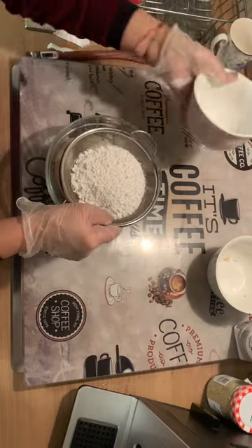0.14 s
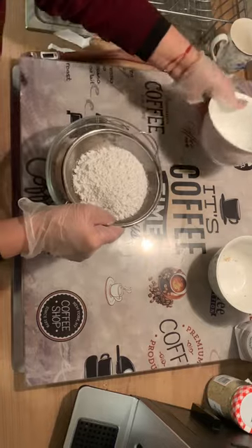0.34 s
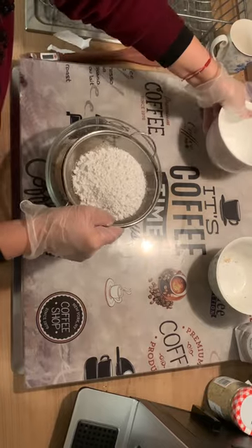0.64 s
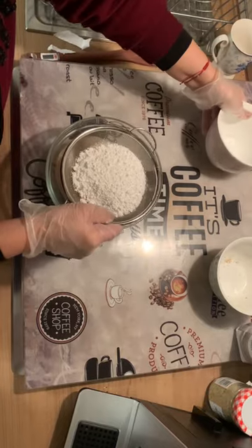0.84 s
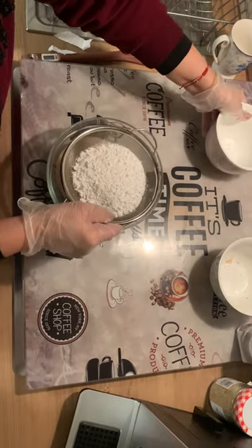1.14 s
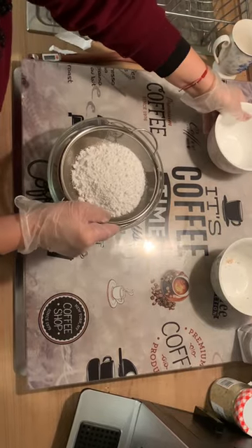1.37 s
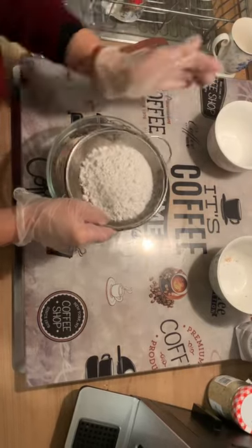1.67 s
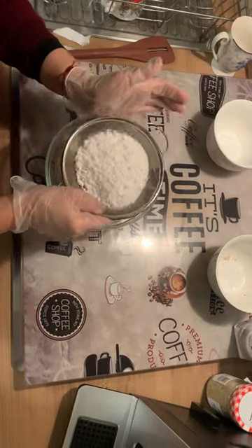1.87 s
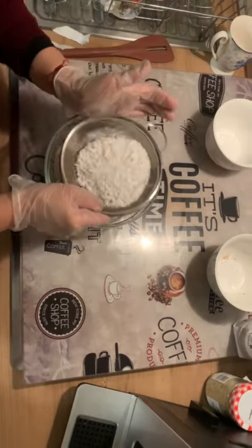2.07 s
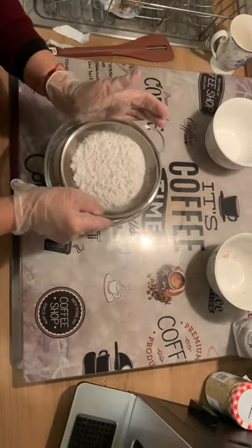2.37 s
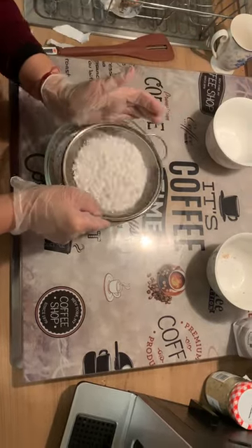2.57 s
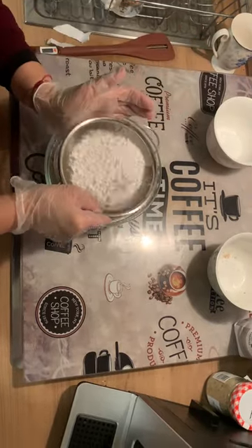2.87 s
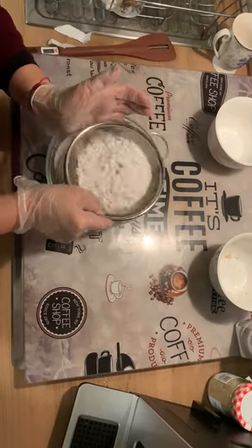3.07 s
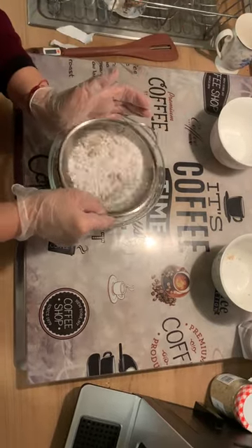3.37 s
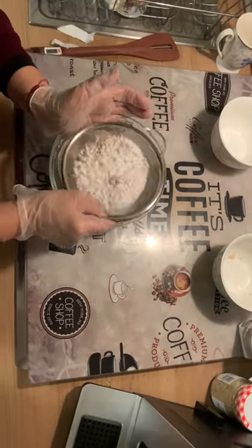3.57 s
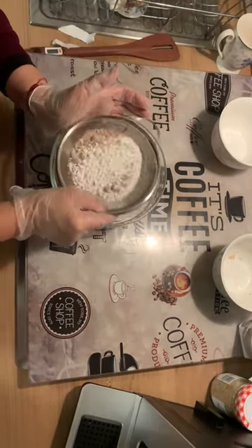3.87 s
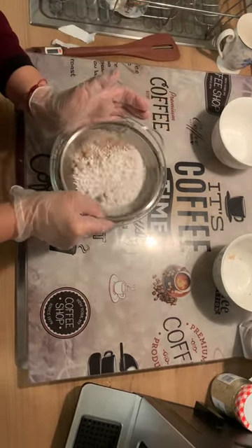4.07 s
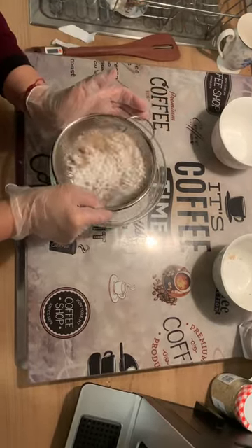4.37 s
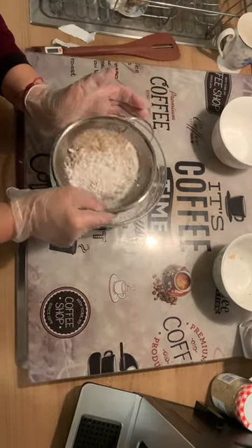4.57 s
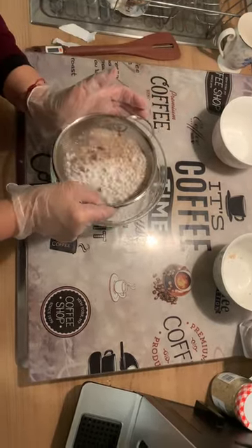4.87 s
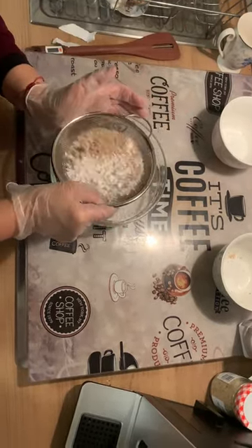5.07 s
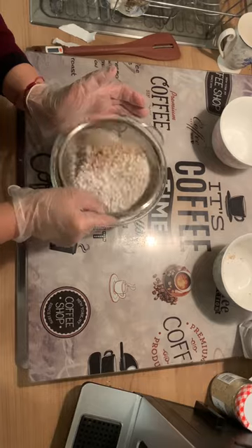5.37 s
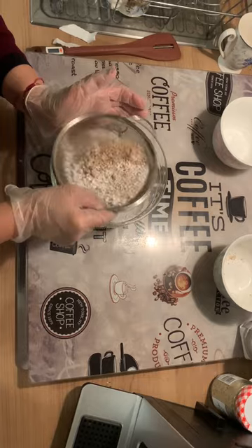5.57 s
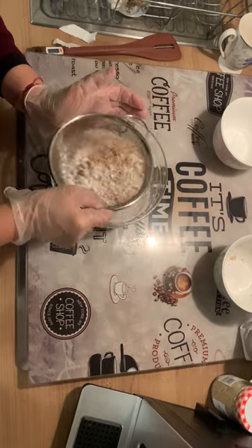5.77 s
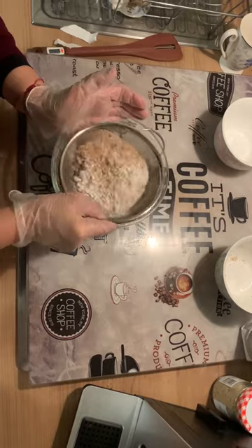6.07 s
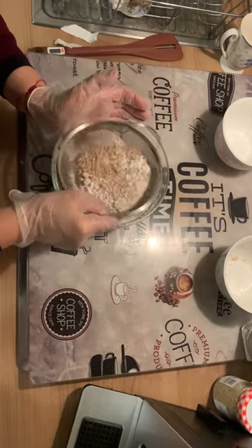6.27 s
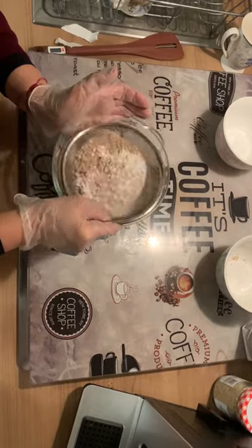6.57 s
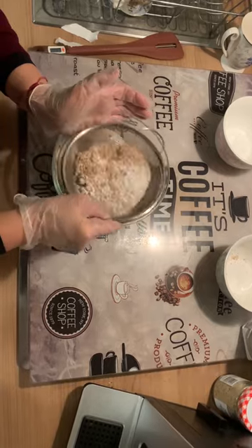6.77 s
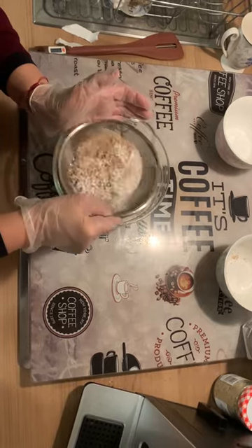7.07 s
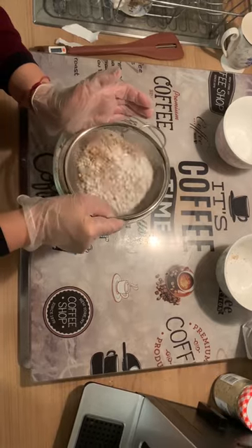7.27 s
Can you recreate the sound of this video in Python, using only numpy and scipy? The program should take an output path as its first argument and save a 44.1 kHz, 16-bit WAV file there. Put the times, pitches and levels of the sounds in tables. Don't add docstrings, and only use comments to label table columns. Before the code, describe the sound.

Close up in a small kitchen, the last sugar rustles softly out of a bowl. The bowl is put down on a board with two loud, clattering knocks and a low counter thud. After a brief glove swish, a fine sieve is tapped on a palm nearly six times a second, each stroke a crisp grainy hiss, growing stronger to the end. A fridge hums faintly.

```python
import sys
import numpy as np
from scipy import signal
from scipy.fft import rfft, irfft, next_fast_len
from scipy.io import wavfile
from scipy.ndimage import uniform_filter1d

SR = 44100
rng = np.random.default_rng(int(sys.argv[2]) if len(sys.argv) > 2 else 0)


def invert_db(level):
    return 10 ** (np.asarray(level, dtype=float) / 20)


def store_pcm(level_fs):
    pcm = np.round(np.clip(level_fs, -1, 1) * 32767).astype(np.int16)
    wavfile.write(sys.argv[1], SR, np.atleast_2d(pcm).T)


N = 328104


def rms_one(x):
    return x / np.sqrt(np.mean(x ** 2) + 1e-20)


def at_hz(points, hz):
    points = np.array(points)
    return np.interp(np.log(hz + 1), np.log(points[:, 0]), points[:, 1])


def colour(x, spectrum):
    size = next_fast_len(N)
    gain = invert_db(at_hz(spectrum, np.fft.rfftfreq(size, 1 / SR)))
    return rms_one(irfft(rfft(x, size) * gain, size)[..., :N])


def bandpass(x, low_hz, high_hz):
    return signal.sosfilt(signal.butter(2, [low_hz, high_hz], "band", fs=SR, output="sos"), x)


def wander(size):
    return rms_one(uniform_filter1d(uniform_filter1d(rng.standard_normal(N), size), size))


def add(track, start_s, shape):
    at = round(start_s * SR)
    track[..., at:at + shape.shape[-1]] += shape[..., :N - at]


def ring(clicks, hz, t60_s):
    r = invert_db(-60 / (t60_s * SR))
    w = 2 * np.pi * min(hz, 0.45 * SR) / SR
    return signal.lfilter([0, np.sin(w)], [1, -2 * r * np.cos(w), r * r], clicks + 1e-18)


# frequency in Hz, level in dB per Hz.
HUM_SPECTRUM = [(15, -30), (31, -23), (37, -5.5), (44, 0), (68, -21.5), (88, -4), (100, 3), (112, -5.5),
                (135, -18.5), (200, -27), (300, -30.5), (450, -40.5), (900, -88.5)]
# frequency in Hz, level in dB per Hz.
HISS_SPECTRUM = [(200, 8), (500, 4), (1000, -0.5), (2500, -0.5), (5000, -2.5), (9000, -4), (12000, -2.5),
                 (14000, -5.5), (16000, -14.5)]


def hum_and_hiss():
    hum = invert_db(-52.5) * colour(rng.standard_normal((2, N)), HUM_SPECTRUM)
    hiss = invert_db(-67) * colour(rng.standard_normal((2, N)), HISS_SPECTRUM)
    return hum + hiss


# frequency in Hz, level in dB per Hz.
GRAIN_SPECTRUM = [(250, -18.5), (650, -8.5), (1000, -7), (1300, -9), (2000, -5.5), (3500, -1.5), (5200, 6),
                  (6500, 7.5), (7600, 3.5), (9200, 0.5), (10500, -5), (12000, -0.5), (14000, -19.5),
                  (16000, -18.5)]


def grain_noise(per_s, spread_db, clump_db, patchy_db):
    struck = rng.random((2, N)) < per_s / SR
    strength = invert_db(spread_db * np.minimum(rng.exponential(1, (2, N)), 4))
    ticks = struck * strength * rng.standard_normal((2, N))
    ticks = colour(ticks, GRAIN_SPECTRUM) * invert_db(clump_db * wander(size=90))
    edges_hz = [200, 1000, 1700, 2700, 3700, 5000, 6300, 7800, 9500, 12000, 17000]
    return [bandpass(ticks, low, high) * invert_db(patchy_db * wander(size=700))
            for low, high in zip(edges_hz, edges_hz[1:])]


# loudest moment in seconds, level in dB, rise in seconds, fall in seconds, dull part in dB.
SWISHES = [
    (0.01, -55, 0.039, 0.045, -10),
    (0.1, -66.5, 0.076, 0.079, -2.5),
    (0.23, -54, 0.048, 0.047, -13),
    (0.375, -55, 0.013, 0.019, -4),
    (1.41, -59, 0.022, 0.043, -15),
    (1.47, -59, 0.021, 0.039, 2.5),
    (1.584, -63, .03, 0.057, -6.5),
]


def loose_sugar(bands):
    bright = rms_one(sum(bands[5:])) * invert_db(5)
    dull = rms_one(sum(bands[1:3])) * invert_db(3) + rms_one(bands[3]) * invert_db(8.5) + rms_one(bands[4]) * invert_db(2)
    now, out = np.arange(N) / SR, np.zeros((2, N))
    for s, db, rise_s, fall_s, dull_db in SWISHES:
        swell = invert_db(db) * np.exp(-np.abs(now - s) / np.where(now < s, rise_s, fall_s))
        out += swell * (bright + invert_db(dull_db) * dull)
    return out


# start in seconds,
# peak in dB, frequency in Hz, swell in seconds.
THUMPS = [(0.298, -35.5, 75, 0.0059), (0.813, -52, 67.6, 0.015), (1.053, -37.5, 68.5, 0.026),
          (1.114, -48, 149.6, 0.034), (1.289, -41, 68, 0.029), (1.35, -24.5, 60.2, 0.033),
          (1.351, -25.5, 130.8, 0.025), (1.354, -23.5, 161.4, 0.015), (1.62, -31.5, 66.5, 0.019),
          (1.625, -49.5, 140, 0.014), (1.754, -54, 612, 0.0027), (1.768, -43, 87.3, 0.019),
          (1.771, -48, 300, 0.0016), (1.772, -53, 640, .0015), (2.102, -44, 70.9, 0.015),
          (2.281, -47, 118.8, 0.013), (2.312, -51.5, 223, 0.0047), (2.399, -49, 150, 0.0095),
          (2.405, -51, 330, 0.002), (4.18, -42, 97.4, 0.02)]


def counter():
    out, t = np.zeros(N), np.arange(SR // 2) / SR
    for s, db, hz, swell_s in THUMPS:
        add(out, s, invert_db(db) * np.sin(2 * np.pi * hz * t) * t / swell_s * np.exp(1 - t / swell_s))
    return out * np.ones((2, 1))


# frequency in Hz, t60 in seconds.
ROOM_T60 = [(100, 0.62), (300, .3), (1000, 0.26), (3000, .2), (8000, 0.079)]


def room(x):
    t, tail = np.arange(SR // 2) / SR, 0
    for low_hz in 40 * 2. ** np.arange(8):
        band = bandpass(rng.standard_normal((2, len(t))), low_hz, 2 * low_hz)
        decay = invert_db(-60 * t / at_hz(ROOM_T60, 1.4 * low_hz))
        tail = tail + band * decay * (1 - np.exp(-t / 0.0015))
    return signal.fftconvolve(x, tail / np.sqrt(np.sum(tail ** 2) / 2), axes=1)[:, :x.shape[1]]


# landing in seconds, level in dB, swell in dB per second, length in seconds.
DRAGS = [
    (1.111, -40, 349, 0.024),
    (1.35, -40, 300, .1),
]
# time in seconds, level in dB, rattle length in seconds, clack in dB, room in dB.
KNOCKS = [
    (1.108, -5.5, .0038, 5.5, -5.5),
    (1.3468, -1, 0.0054, 3.5, -6),
]
# frequency in Hz, level in dB, t60 in seconds.
FIRST_KNOCK_MODES = [(330, -16.5, 0.21), (438, -4, 0.063), (560, -5, 0.066), (790, -6, 0.048),
                     (1340, -18, 0.05), (1502, -4, 0.027), (1920, -3, 0.069), (1820, 3, .03),
                     (2124, -1, 0.035), (2935, -0.5, 0.056), (4180, -12.5, 0.04), (5828, -6, 0.03),
                     (6740, -8, 0.0061), (10670, -24.5, 0.016)]
# frequency in Hz, level in dB, t60 in seconds.
SECOND_KNOCK_MODES = [(242, -15, 0.2), (310, -17, .09), (402, -13.5, 0.1), (515.3, -10, 0.053),
                      (618, 1.5, 0.081), (788.3, -1.5, 0.047), (940, -8.5, 0.078), (1134, 3, 0.052),
                      (1893, -1.5, .025), (2940, -16.5, 0.049), (3960, -12, .015), (6600, -16, 0.0089),
                      (10630, -28, 0.079), (14500, -52, .02)]
# frequency in Hz, level in dB per Hz.
CLACK_SPECTRUM = [(100, -32.5), (250, -1.5), (600, 0.5), (1200, -6.5), (2000, -10.5), (3000, -4.5),
                  (4500, -14), (7000, -21.5), (10000, -31), (14000, -56.5)]


def bowl():
    out, t, now = np.zeros((2, N)), np.arange(SR) / SR, np.arange(N) / SR
    scrape = colour(rng.standard_normal((2, N)),
                    [(300, -16), (900, -3.5), (2000, 0), (4000, -9.5), (8000, -22.5), (14000, -25)])
    for s, db, swell_db_per_s, length_s in DRAGS:
        dragging = (now < s) * (now > s - length_s)
        out += scrape * dragging * invert_db(db - swell_db_per_s * np.abs(s - now))
    clatter = colour(rng.standard_normal((2, N)), CLACK_SPECTRUM)
    for (s, db, length_s, clack_db, room_db), modes in zip(KNOCKS, (FIRST_KNOCK_MODES, SECOND_KNOCK_MODES)):
        push = (t / length_s) ** 2 * np.exp(-(t / length_s) ** 1.464)
        rattle = push * (rng.random(SR) < 5000 / SR) * rng.standard_normal((2, SR))
        rung = sum(ring(rattle, hz, t60_s) * invert_db(level_db) for hz, level_db, t60_s in modes)
        rung = rung / np.max(np.abs(rung), axis=1, keepdims=True)
        clack = invert_db(clack_db - 9) * push * clatter[:, round(s * SR):][:, :SR]
        add(out, s - 0.0015, invert_db(db) * (rung + clack + invert_db(room_db) * room(clack + 0.19 * rung)))
    add(out, KNOCKS[-1][0], invert_db(-46 - 60 * t / 0.55) * np.sin(2 * np.pi * 1385 * t))
    return out


# frequency in Hz, level in dB.
SLIDE_COLOUR = [(600, -2), (1300, 2.5), (2200, -2), (3200, -0.5), (4300, -2.5), (5600, 0), (7000, 3),
                (8600, 1), (10700, -1), (14000, -1.5)]
# rim meets palm in seconds, thrown grains in dB, snap in dB,
# slide lead in seconds, slide in dB.
EARLY_STROKES = [(1.7519, -30.5, -8.5, .04, -57), (1.925, -41.5, 7.5, .04, -51),
                 (2.102, -28, -10, .039, -46), (2.2827, -27, -0.5, 0.027, -40.5),
                 (2.4623, -29, 4, 0.04, -42.5), (2.6285, -31, 7, 0.034, -40.5),
                 (2.812, -35, 13, 0.039, -40), (2.9741, -28.5, 4, 0.03, -41), (3.1388, -29, 8, 0.036, -41),
                 (3.3233, -36.5, 8.5, 0.05, -41.5), (3.479, -27, -23, 0.068, -45.5),
                 (3.6502, -26.5, -9, 0.044, -48), (3.8173, -26, -6.5, 0.039, -41.5),
                 (3.9875, -31.5, 11, 0.046, -38.5), (4.1709, -33.5, 15.5, 0.052, -39.5),
                 (4.3475, -31, 11, 0.054, -36.5)]
# rim meets palm in seconds, thrown grains in dB, snap in dB, slide
# lead in seconds, slide in dB.
LATE_STROKES = [(4.5215, -26.5, -18, 0.054, -40.5), (4.7042, -22.5, -4, 0.058, -38.5),
                (4.8805, -25.5, -5, 0.044, -38), (5.0514, -23.5, -19, 0.044, -39.5),
                (5.227, -26, -4, 0.047, -36), (5.4078, -26, -0.5, 0.047, -36),
                (5.5852, -25.5, -3, 0.045, -35.5), (5.775, -23.5, -15, 0.059, -38.5),
                (5.9501, -23, -8, 0.054, -37.5), (6.1204, -26, 8.5, 0.037, -35.5),
                (6.2976, -23.5, 0.5, 0.051, -38.5), (6.4772, -23, -14, 0.046, -36),
                (6.6483, -24, -15, 0.044, -36.5), (6.8186, -23, -21, 0.041, -35.5),
                (6.991, -23, -2, 0.039, -36), (7.153, -26, -12, 0.073, -44),
                (7.332, -23.5, -19, 0.046, -40)]
STROKES = EARLY_STROKES + LATE_STROKES


def sieved_sugar(bands):
    slide, thrown = np.zeros(N), np.zeros(N)
    t, now = np.arange(SR // 2) / SR, np.arange(N) / SR
    swell_s, length_per_lead, settle_s, snap_s = 0.039, 1.29, 0.034, 0.0067
    for s, db, snap_db, lead_s, slide_db in STROKES:
        swell = (1 - np.exp(-t / swell_s)) ** 2 * np.exp(-(t / (length_per_lead * lead_s)) ** 2)
        add(slide, s - lead_s - 0.014, invert_db(2 * slide_db) * swell)
        throw = np.exp(-2 * t / settle_s) + invert_db(2 * snap_db) * np.exp(-t / snap_s)
        add(thrown, s, invert_db(2 * (db - 11)) * throw * (1 - np.exp(-t / 0.002)))
    slide += (now > 1.78) * invert_db(2 * (-64 + 2.5 * wander(size=6000)))
    return sum(np.sqrt(thrown + invert_db(2 * db) * slide) * band for (hz, db), band in zip(SLIDE_COLOUR, bands))


def throw_swing_db():
    thrown_db = np.array(STROKES)[:, 1]
    return thrown_db - thrown_db.mean()


# frequency in Hz, level in dB, t60 in seconds.
RIM_MODES = [(1299, 0, 0.05), (1963, -5, 0.05), (3420, 1, 0.03), (4030, 2, 0.035), (7450, 3, 0.07),
             (10700, -5, 0.023)]


def rim():
    at, out = np.round(np.array(STROKES)[:, 0] * SR).astype(int), np.zeros((2, N))
    ring_db = -60 + 0.47 * throw_swing_db() + 7 * rng.standard_normal(len(at))
    for hz, level_db, t60_s in RIM_MODES:
        clicks = np.zeros((2, N))
        clicks[:, at] = invert_db(ring_db + level_db) * rng.standard_normal((2, len(at)))
        out += ring(clicks, hz, t60_s)
    return out


# time in seconds, level in dB.
SLAPS = [(1.764, -56), (2.283, -54.5), (2.629, -57), (2.812, -64), (2.974, -58.5), (3.139, -55),
         (4.347, -57.5), (4.705, -66), (5.228, -58), (5.585, -58.5), (5.953, -58), (6.119, -62),
         (6.299, -60), (6.477, -58.5), (6.99, -67), (7.33, -58)]


def palm():
    puff, t = np.zeros(N), np.arange(SR // 10) / SR
    taps = zip(np.array(STROKES)[:, 0], -68.5 + 0.35 * throw_swing_db())
    for s, db in [*taps, *SLAPS]:
        add(puff, s, invert_db(db + 4) * (t / 0.012) * np.exp(-t / 0.013))
    spectrum = [(80, 3), (200, 24.5), (500, 16.5), (900, 12), (1500, -34)]
    return puff * colour(rng.standard_normal((2, N)), spectrum)


# frequency in Hz, phase of right against left in radians,
# likeness 0 to 1, right gain in dB.
PORTS = [(0, 0, .98, -.8), (200, .5, .9, 0), (850, 2.8, .55, .6), (1200, 5.6, .6, 2), (2050, 6.0, .55, 2.2),
         (2450, 3.3, .6, 3), (2950, 3.15, .92, .8), (3400, 3.3, .88, .8), (4100, 3.8, .6, 1),
         (4700, 3.2, .95, 0), (5100, 3.1, .96, 0), (6500, 1.55, .92, 0), (7800, 0, .99, 0),
         (8800, 0, .99, 0), (10200, -1.6, .88, 0), (11500, -2.6, .9, 0), (11850, -3.14, .999, 0),
         (13050, -3.14, .999, 0), (13500, -3.7, .93, 0), (14000, -4.8, .7, 0), (15300, -6.28, .95, 0),
         (22050, -6.28, .95, 0)]


def ports(x, diffuse, right_db):
    size = next_fast_len(N + SR // 10)
    hz, phase, alike, gain_db = np.transpose(PORTS)
    f = np.fft.rfftfreq(size, 1 / SR)
    alike = np.interp(f, hz, alike) ** (1 + abs(diffuse))
    same, other = rfft(x, size)
    right = (alike * same + np.sqrt(1 - alike ** 2) * other) * np.exp(1j * np.interp(f, hz, phase))
    tilt = invert_db(np.interp(f, hz, gain_db) * right_db / 2)
    return irfft(np.array([same / tilt, right * tilt]), size)[:, :N]


def scene():
    background = ports(hum_and_hiss(), diffuse=1.5, right_db=-0.25)
    bands = grain_noise(per_s=9000, spread_db=2.5, clump_db=1.0, patchy_db=1.5)
    close = loose_sugar(bands) + counter() + sieved_sugar(bands) + rim() + palm()
    near = ports(close, diffuse=0.059, right_db=1.65)
    return background + near + ports(bowl(), diffuse=0.53, right_db=1.0)


def roll_off(x):
    return signal.sosfilt(signal.butter(12, 16620, fs=SR, output="sos"), x)


def record(dry):
    low_pass = signal.cheby2(24, 70, 16100, fs=SR, output="sos")
    mix = signal.sosfilt(low_pass, np.clip(dry, -0.96, 0.96))
    return roll_off(mix)


dry = scene()
out = record(dry)
store_pcm(out)
```